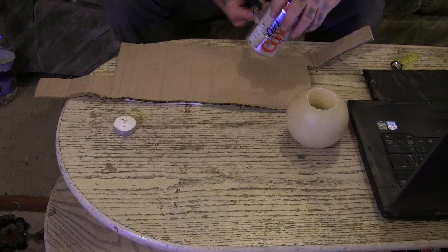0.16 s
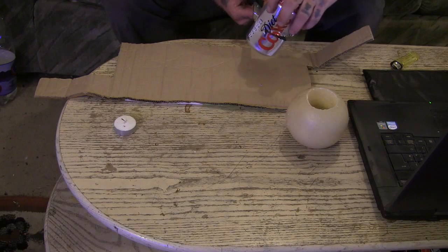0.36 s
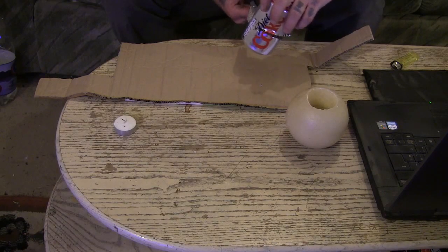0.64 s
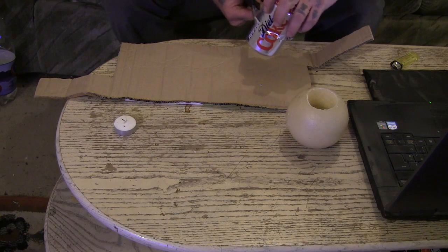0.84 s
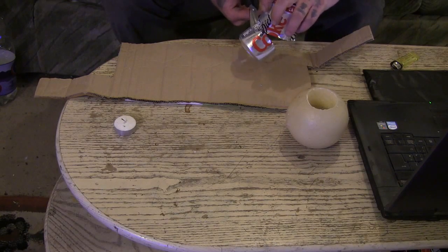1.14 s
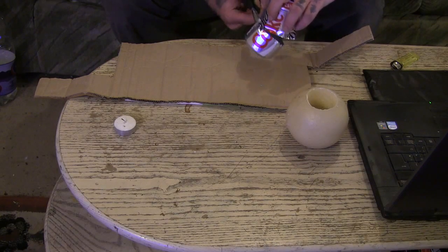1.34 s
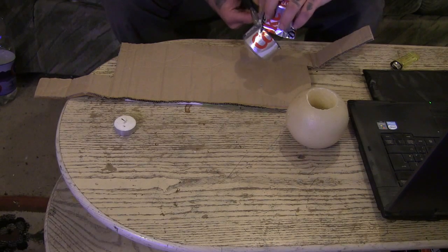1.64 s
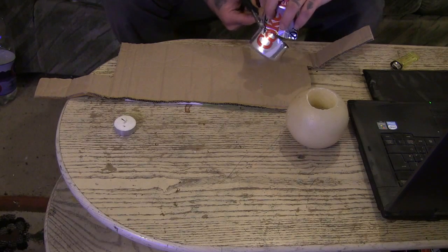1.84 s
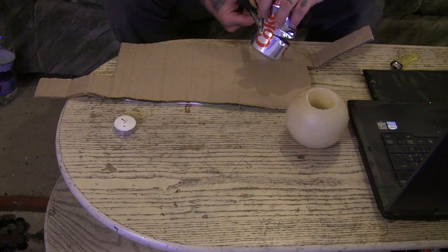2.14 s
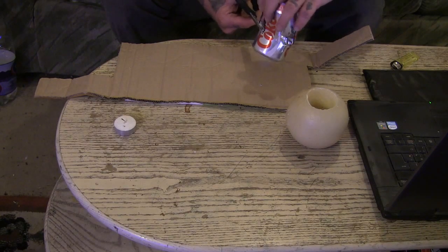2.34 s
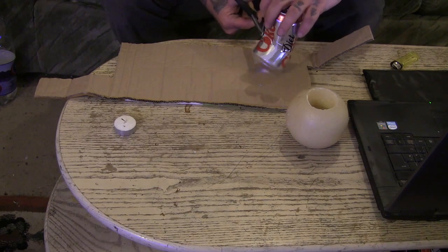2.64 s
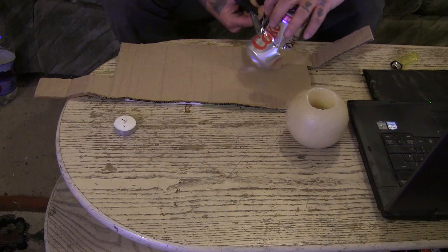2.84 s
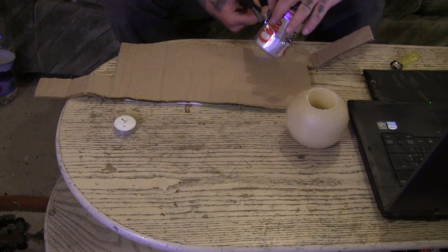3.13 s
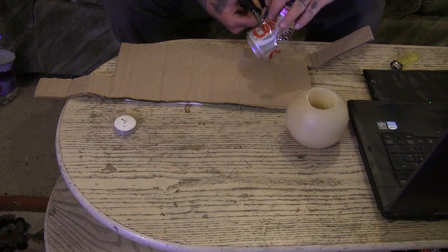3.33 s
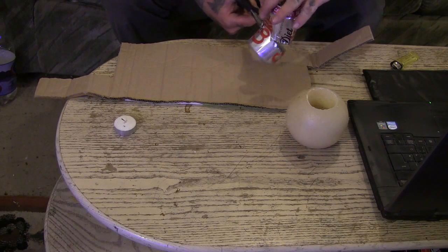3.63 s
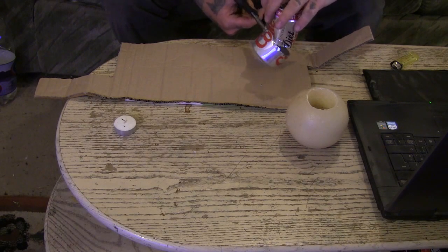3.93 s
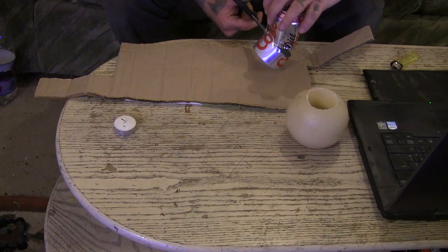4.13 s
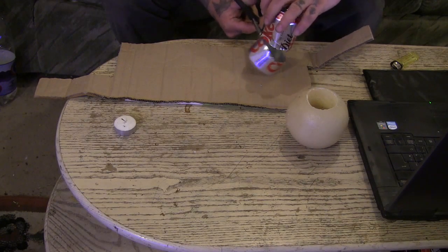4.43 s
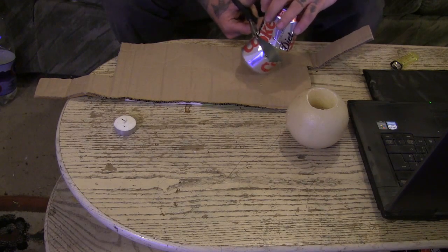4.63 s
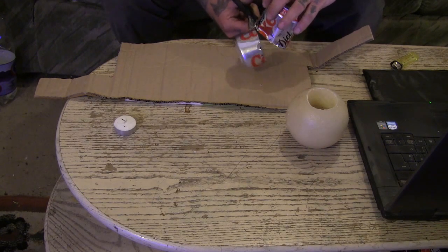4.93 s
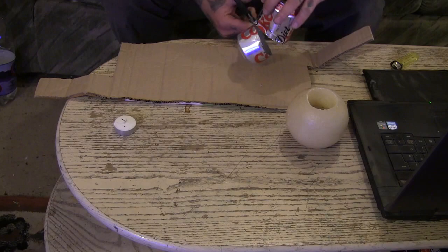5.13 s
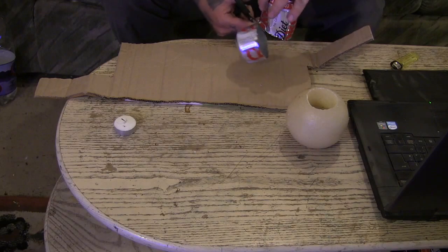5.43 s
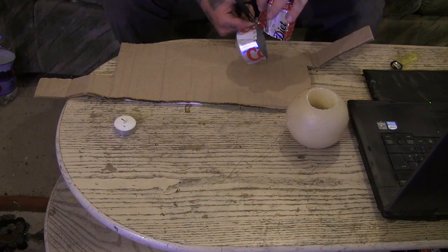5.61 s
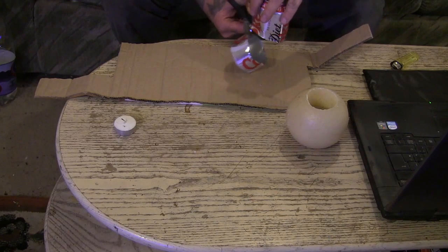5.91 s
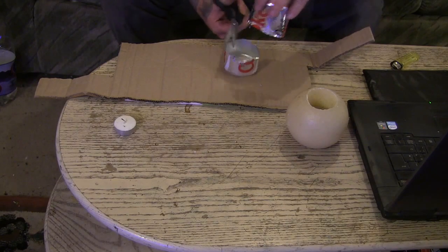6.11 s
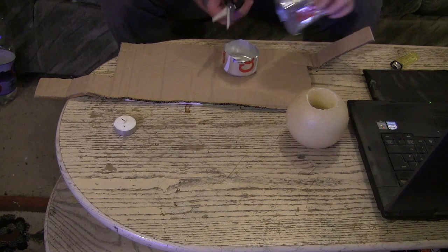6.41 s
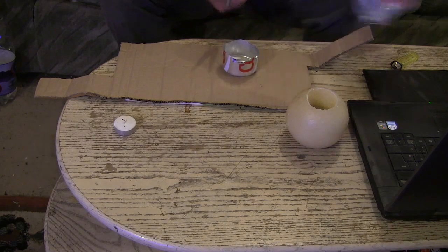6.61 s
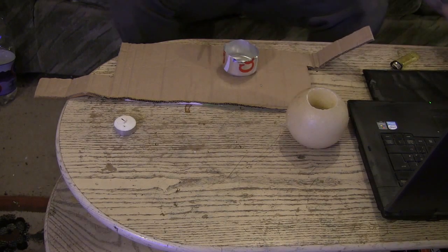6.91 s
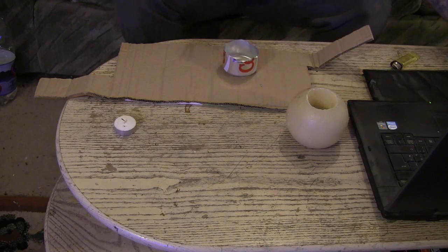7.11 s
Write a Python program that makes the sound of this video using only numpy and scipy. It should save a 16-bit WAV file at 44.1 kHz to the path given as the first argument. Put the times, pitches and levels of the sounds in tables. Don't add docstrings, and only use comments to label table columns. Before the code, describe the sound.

Sharp crackling scissor snips tear around an aluminium can in a quiet room, thinning to small crinkles and a light tinny drop.

```python
import sys
import numpy as np
from scipy import signal
from scipy.fft import rfft, irfft, next_fast_len
from scipy.io import wavfile
from scipy.ndimage import uniform_filter1d

SR = 44100
rng = np.random.default_rng(int(sys.argv[2]) if len(sys.argv) > 2 else 0)


def materialize(psi):
    bounded = np.clip(np.atleast_2d(psi).T, -1, 1)
    quanta = np.round(bounded * 32767).astype(np.int16)
    wavfile.write(sys.argv[1], SR, quanta)


def field_ratio(decibels):
    return 10 ** (np.asarray(decibels, dtype=float) / 20)


N = 320144


def unit(x):
    return x / np.sqrt(np.mean(x ** 2) + 1e-20)


def along(points, hz):
    f, v = np.transpose(points)
    return np.interp(np.log(hz + 1), np.log(f + 1), v)


def filtered(x, response):
    m = next_fast_len(N + SR // 2)
    return irfft(rfft(x, m) * response(np.fft.rfftfreq(m, 1 / SR)), m)[..., :N]


def causal(gain):
    c = irfft(np.log(gain + 1e-6))
    c[1:len(c) // 2] *= 2
    c[len(c) // 2 + 1:] = 0
    return np.exp(rfft(c))


def follower(x, release_s):
    keep = np.exp(-1 / (release_s * SR))
    return np.sqrt(signal.lfilter([1 - keep], [1, -keep], x ** 2))


# frequency in Hz, density in dB per Hz.
HUSH = [(24, -49), (36, -11.5), (54, -15.5), (125, -10), (170, 0.5), (339, -5), (1110, -2.5), (1220, -7),
        (3350, -13), (3800, -14.5), (14100, -30), (15000, -22), (15300, -40.5)]
# frequency in Hz, left-right likeness (0-1).
HUSH_ALIKE = [(60, 0.54), (240, 0.63), (950, 0.81), (3770, 0.78), (15000, 0.32)]
# frequency in Hz, level in dB rms.
FAN_WHINES = [(1044, -67), (1136, -67)]


def hush():
    def response(hz):
        turn = np.arccos(np.clip(along(HUSH_ALIKE, hz), -1, 1)) / 2
        return field_ratio(along(HUSH, hz)) * [np.cos(turn), np.sin(turn)]

    level_db = -55
    mid, side = filtered(rng.standard_normal((2, N)), response)
    noise = field_ratio(level_db + 2) * unit(np.array([mid + side, mid - side]))
    drift = unit(uniform_filter1d(rng.standard_normal(N), 9000))
    t = np.arange(N) / SR
    whine = np.zeros(N)
    for hz, db in FAN_WHINES:
        whine += np.sqrt(2) * field_ratio(db + 1.1 * drift) * np.sin(2 * np.pi * hz * t + 0.2 * drift)
    return noise + whine


def ducking(x, knee_db, depth, release_s):
    return (1 + follower(x, release_s) / field_ratio(knee_db)) ** -depth


def scan_whistle():
    hz, level_db = 15628, -77
    return field_ratio(level_db + 3.0) * np.sqrt(2) * np.sin(2 * np.pi * hz * np.arange(N) / SR)


# frequency in Hz, t60 in s.
ROOM = [(200, 0.39), (600, 0.18), (1500, 0.23), (4000, 0.21), (10000, 0.15), (16000, 0.083)]
# frequency in Hz, left-right likeness (0-1).
ECHO_ALIKE = [(300, 0.91), (1000, 0.89), (2500, 0.93), (5000, 0.75), (12000, 0.74)]


def room(paths):
    hz, t, z = signal.stft(rng.standard_normal((len(paths), 2, SR // 2)), SR, nperseg=256)
    turn = np.arccos(np.clip(along(ECHO_ALIKE, hz), 0, 1))[:, None] / 2
    z = z * field_ratio(-60 * t / along(ROOM, hz)[:, None]) * [np.cos(turn), np.sin(turn)]
    mid, side = signal.istft(z, SR, nperseg=256)[1].swapaxes(0, 1)
    tails = np.array([mid + side, mid - side]) / np.linalg.norm(mid[0])
    tails = np.pad(tails, ((0, 0), (0, 0), (120, 0)))
    return signal.fftconvolve(paths[None], tails, axes=2)[..., :N].sum(axis=1)


def sleeve():
    peak_s, length_s, rms_db, centre_hz = 6.86, .13, -67.5, 9000
    swell = np.exp(-.5 * ((np.arange(N) / SR - peak_s) / length_s) ** 2)
    cloth = filtered(rng.standard_normal(N), lambda f: np.exp(-(np.log((f + 1) / centre_hz) / .45) ** 2))
    return field_ratio(rms_db) * swell * unit(cloth)


# start in seconds, peak in dB.
JOLTS = [(.026, -52), (.2915, -60), (.828, -53), (.99, -52), (1.0616, -56), (1.228, -60), (1.44, -50),
         (1.823, -53), (2.0488, -49), (2.2993, -67), (2.5815, -50), (2.916, -65), (3.5994, -55),
         (3.908, -64), (4.508, -55), (5.035, -62), (5.68, -63), (5.8415, -54)]


def jolts():
    rise_s = 0.002
    t = np.arange(N) / SR
    u = np.array([np.clip(t - s, 0, 1) / rise_s for s, db in JOLTS])
    push = field_ratio([db + 12 for s, db in JOLTS]) @ (u * np.exp(-u))
    return filtered(push, lambda f: (1j * f / (25 + 1j * f)) ** 2)


# start in seconds, frequency in Hz, level # in dB, t60 in s.
RINGS = [(.027, 787, -4.5, 0.032), (.83, 894, -4.5, 0.032), (1.831, 1100, -18.5, 0.14),
         (.99, 734, -18.5, 0.043), (1.397, 980, -22, 0.1), (1.439, 410, -25.5, 0.097),
         (1.508, 972, -25, 0.15), (2.097, 412, -23.5, 0.034), (2.3, 2010, -22.5, 0.062),
         (2.301, 5425, -22, 0.072), (4.848, 1424, -14.5, 0.058), (2.921, 1605, -6.5, 0.083),
         (5.04, 1660, -14, 0.065), (2.296, 1160, -40, 0.2), (5.6806, 1673, -2, 0.018),
         (2.585, 728, -14, 0.091), (2.6, 410, -23.5, 0.071), (2.652, 266, -28.5, 0.087),
         (2.786, 1130, -34, 0.25), (3.42, 1631, -14, 0.084), (5.054, 951, -22.5, 0.24),
         (5.944, 1425, -25.5, .16), (5.828, 1485, -29, 0.39), (3.897, 410, -38.5, 0.088),
         (4.316, 443, -28, 0.04), (5.839, 158, -36.5, 0.088), (5.941, 938, -29, 0.25),
         (5.942, 4270, -49, 0.13), (6.212, 590, -21, 0.034), (6.235, 220, -42.5, 0.23),
         (3.048, 1640, -27, 0.04), (3.435, 1600, -23, .06), (3.449, 1594, -27, 0.02),
         (4.509, 1700, -12, 0.027), (4.544, 1130, -18.5, 0.068), (4.595, 2107, -24, 0.12),
         (4.623, 3377, -29, 0.056), (4.655, 1940, -32, 0.069), (5.034, 1417, -14.5, 0.12),
         (5.074, 1300, -18, 0.052), (5.134, 1655, -28.5, .12), (5.17, 1286, -34.5, 0.19),
         (5.281, 1665, -25, 0.043), (6.217, 1354, -23, 0.049), (1.254, 1070, -17, 0.049),
         (.622, 905, -14.5, 0.029), (.7, 890, -6.5, 0.017), (3.146, 2260, -37, 0.23),
         (1.4395, 3500, -26, 0.14), (1.4396, 1700, -21.5, 0.12), (1.695, 1710, -30, 0.073),
               (2.83, 2214, -40, .15), (2.75, 4720, -51, .1), (3.7, 1302, -37, .2),
               (3.783, 3300, -46.5, 0.16), (4.36, 1320, -42, .15), (5.945, 4300, -40.5, 0.14),
               (6.29, 300, -41, 0.16), (2.468, 988, -38.5, 0.093), (2.279, 1015, -38, 0.17),
               (2.085, 1009, -19.5, 0.083), (2.09, 3350, -32, .1), (5.03, 3500, -25.5, 0.2),
               (5.134, 3550, -30, 0.044), (5.152, 3550, -33, 0.053), (5.59, 3460, -31, 0.15),
               (5.186, 923, -32, 0.17), (5.316, 950, -31, .25), (5.316, 3500, -34.5, 0.079),
               (5.32, 5300, -54, .3), (5.864, 3270, -30, .05), (5.888, 1354, -32, .05),
               (5.949, 1830, -32, 0.12), (6.104, 490, -46, .1), (6.106, 3450, -50, 0.092),
               (6.345, 3366, -55, 0.33), (7.228, 8900, -33, 0.12)]


def rings():
    out, t = np.zeros(N + SR), np.arange(SR // 3) / SR
    for s, hz, db, t60 in RINGS:
        waver = unit(uniform_filter1d(rng.standard_normal(len(t)), 500))
        decay = field_ratio(db - 60 * t / t60 + 3.0 * waver[::-1]) * (1 - np.exp(-t / 0.0018))
        out[round(s * SR):][:len(t)] += decay * np.sin(2 * np.pi * hz * t + 0.59 * waver)
    return filtered(out[:N], lambda f: (1j * f / (150 + 1j * f)) ** 3)


def crackle(chance, spread_db):
    return chance[0] * field_ratio(spread_db * chance[1])


# frequency in Hz, density in dB per Hz.
METAL = [(35, -71), (60, -35), (401, -8), (627, -2.5), (934, 5.5), (1180, 4.5), (1640, 2.5), (2750, -6),
         (3480, -3.5), (5060, -12), (11500, -18), (13900, -23.5), (16400, -49)]


def shell(modes, f, bed_db):
    response = field_ratio(bed_db)
    for k, (hz, width_hz, db) in enumerate(modes):
        peak = 1j * f * width_hz / (hz * hz - f * f + 1j * f * width_hz)
        response = response + (-1) ** k * field_ratio(db - along(METAL, hz)) * peak
    return response


# time in seconds, pressure in dB.
SHEAR = [(0, -19), (.42, -53), (.64, -30), (.81, -31.5), (1.05, -21), (1.33, -29.5), (1.96, -40),
         (2.081, -45), (2.47, -43.5), (3.48, -30.5), (3.62, -33), (4.15, -47.5), (4.67, -31), (5.26, -32),
         (5.76, -31.5), (6.4, -43), (6.851, -48), (7.26, -57.5)]


def shear():
    s, groan_db = np.transpose(SHEAR)
    rasp_db = -9 + 1.33 * groan_db
    t = np.arange(N) / SR
    clumps = unit(uniform_filter1d(rng.standard_normal(N), 300))
    grains = crackle(rng.standard_normal((2, N)), spread_db=1.5) * field_ratio(4 * clumps)
    stage = np.searchsorted(STAGE_ENDS_S[:3:2], t)
    rung = np.zeros(N)
    for k, modes in enumerate([WHOLE, GAPING, HANGING]):
        body = filtered(grains, lambda f: field_ratio(along(METAL, f)) * shell(modes, f, bed_db=-11.0))
        rung += unit(body) * (stage == k)
    low = filtered(rung, lambda f: 1 / (1 + (f / 2500) ** 6))
    groan = unit(low) * field_ratio(np.interp(t, s, groan_db) - 14.5)
    rasp = unit(rung - low) * field_ratio(np.interp(t, s, rasp_db) - 4.0)
    return groan + rasp


def snap_force(t, last_s, first_crack, cracks):
    force = (1 - np.exp(-t / .0007)) * field_ratio(-60 * (t / last_s) ** 2)
    force *= 1 + first_crack * np.exp(-t / 0.00095)
    return force * field_ratio(2.24 * unit(uniform_filter1d(cracks, 40)))


def tear_force(t, last_s):
    clumps = unit(uniform_filter1d(rng.standard_normal(len(t)), 90))
    swell = np.sin(np.pi * np.clip(t / last_s, 0, 1) ** 0.58) ** 1.51
    return swell * (t < last_s) * field_ratio(2.2 * clumps)


# frequency in Hz, width in Hz, level in dB.
WHOLE = [(410, 10, -22), (620, 51, -5), (723, 81, 0.5), (773, 110, 1.5), (784, 4.7, 4), (842, 35, -15),
         (1205, 2.7, -1.5), (1400, 140, -4.5), (1777, 7.8, -10), (2180, 27, -32), (3460, 220, -15.5),
         (4610, 220, -9.5)]
OPENING = [(257, 6, -26), (430.5, 18, -8.5), (700, 40, -11.5), (992, 36, 4), (1130, 14, -5.5),
           (1337, 27, 0.5), (1605, 3.9, -14), (2000, 35, 0.5), (2260, 95, -7), (3350, 530, -0.5),
           (5170, 84, -27)]
GAPING = [(950, 25.2, -4.5), (1290, 37, -25.5), (1600, 19, -8), (2010, 80, -0.5), (2193, 77, -17),
          (3210, 66, -4), (3370, 53, -11.5), (3670, 75, -5.5), (4200, 26, -17), (4300, 120, -12),
          (5300, 61, -18), (5300, 36, -18)]
HANGING = [(410, 85, -19.5), (842, 120, -3), (936, 38, -4.5), (1100, 65, -16), (1230, 19, -4.5),
           (1440, 23, 0), (1660, 14, -19.5), (2000, 26, -2.5), (2753, 89, -42), (3427, 84, -2),
           (4270, 23.5, -24.5), (4700, 35, -13), (7000, 160, -30)]
DROPPED = [(570, 92, 3), (1400, 85, 3), (1700, 130, -5), (2145, 77, 3), (2870, 100, -18), (3500, 68, -16)]
STAGE_ENDS_S = [2.0, 3.1, 4.4, 6.15, 6.8]
# start in seconds, peak, shell and fizz in dB, loudest ring in
# Hz.
BITES = [(.0255, 1, -20, -8.5, 1684), (.2915, -7, -13.5, -5.5, 837), (.6848, -13, -29.5, -20, 925),
         (.828, 3, -17.5, -1.5, 3780), (1.0285, -7, -10, 1.5, 6000), (1.0616, 1.5, -8, 5, 3460),
         (1.2278, -3.5, -4, -8, 890), (1.253, -20.5, 4, -10, 1100), (1.4325, -5, -11, -3, 4670),
         (1.4395, -4, -11.5, -6.5, 3500), (1.7835, -15.5, -18, -11, 900), (1.8233, -13, -25, -10, 1170),
         (2.0488, 1.5, -11.5, 6, 3300),
         (2.2993, -10.5, -13, 2.5, 2000), (2.5814, -3.5, -7, 3.5, 1130),
               (2.605, -10.5, -6.5, -7, 970), (2.6118, -6, -5, 4, 3700), (2.901, -4.5, -10, -36, 2427),
               (2.916, -6, -16, -22, 1715), (3.243, -10.5, -16, -1, 3210), (3.5582, -8.5, -11.5, -8, 1925),
               (3.5993, -7.5, -11, -7, 6740), (4.5076, -7, -19, -5.5, 2065), (4.543, -7.5, -20.5, -7, 1130),
               (4.579, -11, -29, -9.5, 3800), (4.62, -10, -20, 2, 2000), (5.0354, -40, 5, -23, 1470),
               (5.6802, -16.5, -1.5, -5, 1400), (5.8405, -14, -36, 4, 9700), (5.9397, -14, -19, -2, 3600),
               (6.2061, -14, -2, -10, 1394)]
# start in seconds, peak, shell and fizz in dB.
BUCKLES = [(.1275, -17.5, -32, -6), (.2261, -22, -7, 8), (.2395, -18, 0, -1), (.3391, -13, -3.5, 2),
           (.3954, -22, 7, -2.5), (.4079, -22.5, 4, -4), (.6211, -18.5, 9, 1.5), (.6458, -17, -57, -63),
           (.7004, -13.5, 2.5, -10), (.82, -10.5, -5.5, -12), (1.3456, -19.5, -1.5, -12),
           (1.5074, -23, 4, -4), (1.658, -20, -8.5, -14), (1.6959, -22, 1.5, -9.5),
           (2.1066, -16, -21, -1.5), (3.047, -22, -9.5, -5), (3.2012, -18, -9, -7), (3.337, -18, -4.5, -11),
           (3.4209, -13.5, -11, -8), (3.5438, -14.5, -19, -9.5), (3.8625, -13.5, -11.5, 8.5),
           (3.906, -15, -9, 16), (4.845, -15.5, -10.5, -16.5), (4.8963, -18, -5, -14),
           (5.135, -28, -23, -28), (5.3116, -19, -9, -5), (5.5111, -22.5, -13.5, -11),
           (5.5876, -19, -18, -5), (5.9242, -19, -20, -8), (6.2225, -39, -2, 0)]
# start in seconds, peak, shell and fizz in dB.
TICKS = [(.596, -31.5, 16.5, 11), (1.31, -28, -4, -4.5), (1.7393, -26.5, -9, -11), (2.2782, -38, -10, -18),
         (2.4364, -36, 1, -9), (2.4752, -30.5, -1, 2.5), (2.7825, -23.5, -14, -5), (2.8284, -27, -17, -2),
         (3.1467, -29, -10.5, -13), (3.6925, -24, -5, -15), (3.762, -25, 1, -1), (3.7795, -27, -10, 4),
         (4.133, -42.5, -12, 0.5), (4.115, -35.5, 0.5, -31), (4.3116, -32.5, 5, -8),
         (4.3565, -30, -5.5, -16), (4.4823, -24, -18, -13), (4.498, -16, -29, -8), (4.775, -39, 33, -15),
         (5.236, -43, -27, -26), (5.2828, -24, -3.5, -16), (5.4171, -27, -4.5, -6), (5.5575, -24, 6, 2),
         (5.7053, -20, -25, -10), (5.807, -24, -29, 0), (5.8874, -26, -29, -26), (6.103, -40, -18, -36),
         (6.1922, -28, -4.5, -29.5), (6.9024, -32.5, -10, -19), (7.226, -39, -7.5, -1.5)]
# start in seconds, peak, shell and fizz in dB, loudest ring in Hz.
CRACKLES = [(.6078, -24, -2, 0, 8800), (.6567, -17, -3, -12, 3070), (.668, -17.5, -5, -2, 1870),
            (.8125, -25, 0, -8, 920), (.885, -10.5, -10.5, -9, 900), (.9919, -7.5, -26, -15, 2640),
            (1.078, -11.5, -9, -29, 920), (1.145, -20, -3, -12, 3360), (1.158, -17.5, -4, -12, 915),
            (2.935, -5.5, -6, -16, 3500), (2.965, -9, -8.5, -13, 1615), (3.2206, -13, -10, -9.5, 2330),
            (3.3278, -21, -7, -13, 3110), (3.532, -33, -32.5, -0.5, 4110),
            (4.503, -12.5, -26.5, -3.5, 4920), (4.53, -16, -4.5, -21, 2000), (4.57, -26.5, 11, -31, 1100),
            (5.0218, -20, -14, -20, 1660), (5.0318, -21, -11, -16, 1700), (5.088, -25, -10, 3, 1300),
            (5.1525, -24.5, -18, -2, 3460), (5.195, -30, -8, 5, 1270), (5.64, -26.5, -20, 13, 9500),
            (5.78, -26, -24, 3, 9000), (1.2545, -8.5, -2.5, -11, 1246), (3.339, -20, -6, -14, 2000),
            (5.042, -14, -2, -8, 1500), (5.079, -17.5, -3, 2, 1400), (6.225, -29, -6, -16, 2980),
            (6.1218, -45, -7, -10, 3420), (6.2135, -29, -14, -24, 2130)]
# start in seconds, peak, shell and fizz in dB, length in s.
TEARS = [(0, -10, -4.5, -4, 0.02), (0.281, -13.5, -7, -2, 0.022), (0.637, -16, 2, -12, 0.085),
         (0.828, -17, -1.5, -0.5, 0.15), (0.985, -9.5, -15.5, 5, 0.011), (1.062, -15, -3.5, -5.5, 0.14),
         (1.25, -26.5, -1, -5, 0.051), (1.787, -21.5, 1.5, -13, 0.051), (1.822, -6.5, -10, -9.5, 0.058),
         (2.046, -31, 18.5, -22, 0.093), (2.579, -18, 11, 9, .11), (2.889, -7.5, -9.5, 2, 0.12),
         (3.232, -10.5, -12, -4.5, 0.084), (3.425, -18.5, -7, -11.5, 0.048), (3.894, -24, -13, -15, 0.1),
         (4.496, -21.5, -12, -31, 0.1), (4.834, -27.5, 5.5, -8, 0.069), (5.015, -15, -21, -9, 0.1),
         (5.11, -29, -2, -8, 0.13), (5.304, -31.5, -0.5, -8, 0.12), (5.54, -21, -6, -5, 0.13),
         (5.805, -24, -4, -10, 0.13), (6.103, -35.5, -6, -8.5, 0.048), (7.227, -26.5, -1, -2, 0.049)]


def bursts(count):
    span = 8192
    paths, t, f = np.zeros((count, N + span)), np.arange(span) / SR, np.fft.rfftfreq(span, 1 / SR)
    stages, metal = [WHOLE, OPENING, GAPING, HANGING, DROPPED, HANGING], along(METAL, f)
    bite_s, buckle_s, tick_s = 0.022, 0.017, 0.01
    kinds = [(BITES, bite_s), (BUCKLES, buckle_s), (TICKS, tick_s), (CRACKLES, tick_s)]
    snaps = [(*row[:4], last_s, *row[4:]) for rows, last_s in kinds for row in rows]
    for k, (s, db, shell_db, fizz_db, last_s, *ring_hz) in enumerate(snaps + TEARS):
        cracks = crackle(rng.standard_normal((2, span)), spread_db=4.5)
        if k < len(snaps):
            force = snap_force(t, last_s, field_ratio(2) * (last_s == bite_s), cracks)
        else:
            force = tear_force(t, last_s)
        grip = rng.standard_normal((2, 14))
        stage = stages[np.searchsorted(STAGE_ENDS_S, s)]
        modes = [(hz * (1 + 0.016 * a), width_hz, level + 2.2 * b)
                 for (hz, width_hz, level), a, b in zip(stage, *grip)]
        modes += [(hz, 77, along(METAL, hz) + 5.5) for hz in ring_hz]
        tilt = [(900, shell_db + 4.0), (1900, shell_db / 2 + 5.0), (3000, 0.017), (7000, fizz_db + 10.0)]
        lumps_db = 1.3 * unit(uniform_filter1d(rng.standard_normal(len(f)), 70))
        colour = causal(field_ratio(metal + lumps_db + along(tilt, f)))
        sound = rfft(cracks * force) * colour * shell(modes, f, bed_db=-7.0)
        top = np.abs(irfft(sound * (f > 1500))).max()
        paths[k % count, round(s * SR):][:span] += field_ratio(db - 1.5) * irfft(sound) / top
    return paths[:, :N]


def scene():
    paths = bursts(count=5)
    paths[0] += shear()
    paths[1] += rings()
    bass_cut = signal.butter(4, 109, 'high', analog=True)
    paths = filtered(paths, lambda f: signal.freqs(*bass_cut, f)[1])
    can = paths.sum(axis=0)
    floor = hush() * ducking(can, knee_db=-43.5, depth=0.063, release_s=0.39)
    direct = can * field_ratio([[.3], [-.3]])
    echoes = field_ratio(-3.5) * room(paths)
    return direct + echoes + floor + scan_whistle() + jolts() + sleeve()


def narrowed(x, busy_db, busy_s, top_hz):
    level = follower(x.mean(axis=0), busy_s)
    level = np.pad(level, (250, 0))[:N]
    top = filtered(x, lambda hz: 1 / (1 + (top_hz / (hz + 1)) ** 60))
    return x - top + top / (1 + (level / field_ratio(busy_db)) ** 8)


def top_cut(x):
    return signal.sosfilt(signal.butter(12, 16500, fs=SR, output="sos"), x)


def record(dry):
    ceiling, top_hz, offset = 1.05, 15780, -.0005
    x = dry / (1 + np.abs(dry / ceiling) ** 10) ** (1 / 10)
    x = filtered(x, lambda hz: 1 / (1 + (hz / top_hz) ** 120)) + offset
    return top_cut(narrowed(x, busy_db=-28, busy_s=.02, top_hz=14500))


dry = scene()
out = record(dry)
materialize(out)
```